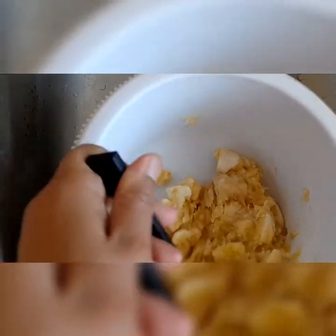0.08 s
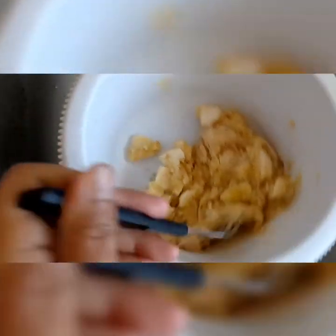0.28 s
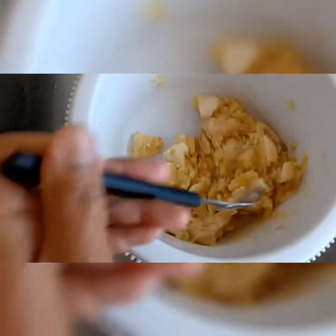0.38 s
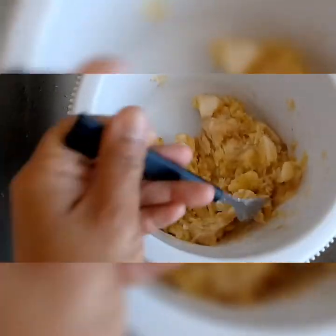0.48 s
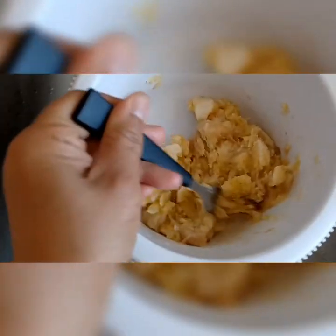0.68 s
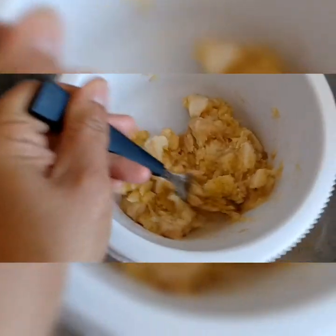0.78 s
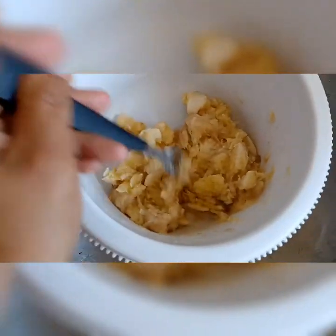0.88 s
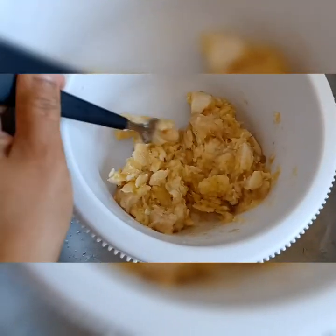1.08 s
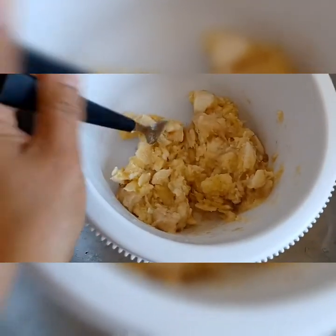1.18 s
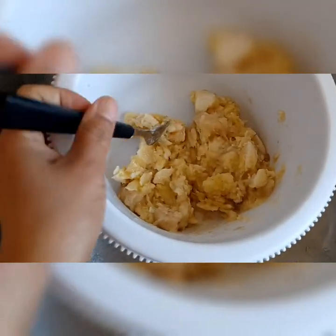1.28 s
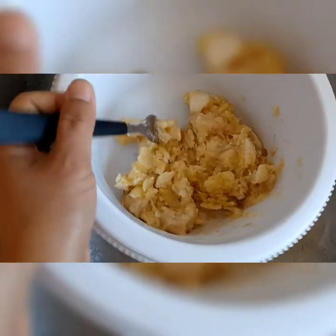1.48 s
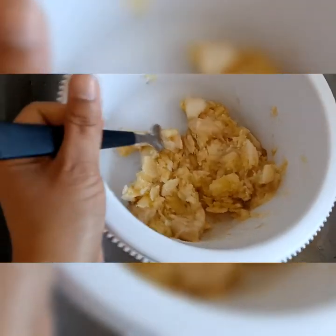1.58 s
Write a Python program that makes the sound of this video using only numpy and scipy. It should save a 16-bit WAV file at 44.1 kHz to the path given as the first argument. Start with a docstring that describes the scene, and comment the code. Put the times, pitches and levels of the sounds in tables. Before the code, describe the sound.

A fork mashes sticky pulp: quick squelches with low rubbing groans, hollow plastic knocks and faint tine squeaks, a pause, a dull bowl tap on the basin, and a last weak squish, heard close in a small reverberant kitchen.

```python
"""A wet squish is heard first, close by: a fork mashing ripe banana in a plastic bowl in a kitchen sink.
Bursts of impulsive grains, filtered, make the pulp; the same grains drive the bowl's resonances to a groan.
Narrow-band noise makes the tines squeak; decaying sines make the bowl knock and the basin boom.
Decaying coloured noise gives the smacks, clacks and foot taps, the last two with short rings.
Decaying noise tails form the small hard room, over a steady hush."""
import sys
import numpy as np
from scipy import signal
from scipy.io import wavfile
from scipy.ndimage import uniform_filter1d

SR = 44100
rng = np.random.default_rng(int(sys.argv[2]) if len(sys.argv) > 2 else 0)


def log_audio(samples):
    """Write samples as a 16-bit WAV file to the path given in sys.argv[1]."""
    # one column per channel
    frames = np.atleast_2d(samples).T
    # limit to full scale, then quantise
    limited = np.clip(frames, -1, 1)
    pcm = np.round(limited * 32767).astype(np.int16)
    wavfile.write(sys.argv[1], SR, pcm)


N = 70560
T = np.arange(N) / SR  # time in seconds

# Strokes of the fork, one curve each: time_s, squish_level_db, groan_db (against the squish),
# pitch_hz (of the loaded bowl)
STROKES = [
    [(0, -42.5, -17, 458), (.03, -48.5, -3.5, 434), (.08, -50.5, -32, 436), (.12, -55.5, -18, 436),
     (.15, -55.5, -2, 412), (.2, -57, 6, 435)],
    [(.215, -35, 4, 452), (.24, -36.5, 0.5, 449), (.275, -30, -6, 444), (.305, -36.5, -30, 453),
     (.33, -42, -29, 449)],
    [(.34, -40.5, -21, 437), (.362, -26.5, 10, 436.2), (.378, -30.5, 8.5, 423.5), (.392, -27, -4.5, 429),
     (.412, -30.5, 3, 436), (.43, -27.5, -10, 456), (.46, -37.5, -30, 419), (.49, -40, -12, 434),
     (.54, -67, 4, 430)],
    [(.772, -62.5, 9, 371), (.81, -43.5, 1, 390), (.845, -37, 2.5, 402), (.87, -33.5, 4, 432),
     (.905, -31, -33, 442), (.93, -40, -13, 383), (.96, -31, -12, 307.5), (1.0, -40, -11, 300),
     (1.05, -71, -7, 314)],
    [(1.455, -60, 14.5, 320), (1.467, -37, -5, 318), (1.482, -60, 11, 317), (1.5, -96, -10, 320)],
    [(1.535, -61, -21, 320), (1.555, -44.5, 4.5, 318), (1.58, -45.5, -18, 323), (1.6, -37.5, -1, 339)],
]
# Spectrum of the squish: frequency_hz, relative_level_db (per Hz)
PULP_SPECTRUM = [(100, -7), (350, -5.5), (800, -4.5), (1050, -3.5), (1250, 0), (1430, -5), (1750, 2),
                 (2200, -1.5), (3200, -0.5), (3900, 0.5), (5600, -2), (7000, -11), (8600, -15.5),
                 (10500, -9.5), (12500, -9.5), (15500, -11.5)]
# Bowl resonances rubbed by the tines: ratio (to the bowl's pitch), width_hz (of each of two poles), level_db
GROAN_RESONANCES = [(0.521, 79.4, -14), (.8, 60.5, -9), (0.998, 50, 1), (1.44, 61, -7.5), (1.62, 74, -8)]
# Tines squeaking over the plastic: start_s, length_s, start_hz, end_hz, level_db
TINE_SQUEAKS = [(-0.038, 0.18, 1272, 1240, -44), (-0.048, 0.17, 1010, 995, -50.5),
                (.31, 0.18, 1840, 1840, -44), (.82, 0.094, 1816, 1720, -38.5),
                (.88, 0.081, 1640, 1586, -38), (.87, 0.12, 3900, 3800, -36.5), (.83, .055, 611, 642, -34.5),
                (.96, 0.074, 548, 573, -46), (1.55, 0.1, 1800, 1680, -51.5)]
# Bowl rocking on the basin: start_s, level_db, upper_modes_db, free (share of the full ring length)
THUMPS = [(0, -44.5, 7.5, 0.81), (0.053, -47.5, 9.5, 1.07), (0.132, -29, 2, 0.28), (0.162, -32, 2, 0.47),
          (.214, -21.5, 2.5, 1), (0.248, -26, 5, .9), (0.356, -26, 0, 0.86), (.475, -37.5, 14.5, 0.91),
          (0.509, -31.5, -13, 1), (.802, -32.5, -14, 0.75), (0.965, -33, 6, 0.54),
          (1.029, -49.5, 17.5, 0.79), (1.22, -23.5, -4, 1.09), (1.307, -34.5, -0.5, 1.02),
          (1.403, -32.5, 5.5, 0.48), (1.47, -35.5, 4, 0.66), (1.548, -37.5, 2, 0.94)]
# Hollow boom of the basin: frequency_hz, level_db, t60_s (at full ring length)
BASIN_MODES = [(118.1, 3, 0.14), (122.05, -6.5, .4), (173.5, -6, 0.14), (210.7, -3.5, 0.089),
               (264.7, -14.5, 0.17), (313.7, -15, 0.16)]
# Wet pulp snapping apart: start_s, level_db, t60_s
SMACKS = [(.0505, -38.5, 0.027), (.1228, -40, .01), (.1415, -56, 0.017), (.186, -50, .04),
          (.199, -56, 0.015), (0.695, -73, .03), (0.729, -65, 0.17), (.7715, -51, .03), (.7865, -43, 0.011),
          (.843, -36, 0.032), (.86, -36, 0.04), (.393, -31, 0.036), (.452, -27, .03), (1.345, -66, .1),
          (1.46, -63, 0.044)]
# Spectrum of the snapping pulp: frequency_hz, relative_level_db (per Hz)
SMACK_SPECTRUM = [(500, -27), (4000, 7), (8000, -14), (11000, 0), (13000, 10.5), (16000, -7)]
# Fork bottoming through the pulp: start_s, level_db, pitch_hz (of the loaded bowl), lower_modes_db,
# upper_modes_db, contact_s (time constant of the onset), after_ring_db
KNOCKS = [(0.2133, -7.5, 455.6, 2, -4.5, 0.0021, -13.5), (.356, -12.5, 431, -3, 9, 0.0024, -18.5),
          (.3635, -14.5, 433.3, -1, 3.5, 0.0012, -15.5), (.761, -35, 386, -3, -18, 0.0013, -38),
          (0.8533, -17.5, 398.4, -7, -6, 0.0021, -23), (.916, -34.5, 370, -10, -8, 0.0022, -16),
          (.963, -22.5, 316, -4, 3, 0.0023, -16)]
# Bowl modes: ratio (to the bowl's pitch), level_db, t60_s
BOWL_MODES = [(.48, -6, 0.062), (.67, -18, 0.16), (1, 1.5, 0.059), (1.48, -13.5, 0.085),
              (1.82, -12.5, 0.058), (2.02, -22.5, 0.088), (2.29, -20, 0.063), (2.74, -21, 0.028)]
# Hard contacts of fork and bowl: start_s, level_db, t60_s, tilt_db_per_octave, ring_db, ring_pitch_hz
CLACKS = [(.2138, -19.5, 0.068, -3, -26, 2280), (.963, -25, 0.042, 1.7, 2.5, 1853),
          (.9665, -23.5, 0.026, -0.95, -8.5, 1783)]
# Spectrum of metal on plastic: frequency_hz, relative_level_db (per Hz)
CLACK_SPECTRUM = [(200, -11.5), (700, -11), (1200, 1.5), (1450, -14.5), (2200, -0.5), (3500, -9.5),
                  (5900, -0.5), (8000, -10.5), (11000, -3), (13500, -4.5), (16000, -22)]
# Tine modes: ratio (to the ring pitch), level_db, t60_s
TINE_MODES = [(.88, -3.5, 0.056), (1, -3.5, 0.09), (2.01, 1.5, 0.039), (2.21, -2.5, 0.025),
              (2.6, 0.5, 0.041)]
# Bowl's foot tapping the sink: start_s, level_db, rattle_db, rattle_t60_s, tilt_db_per_octave
TAPS = [(1.212, -15, -11, 0.057, 0), (1.4782, -31.5, 1.5, 0.042, -0.5)]
# Spectrum of the foot on the sink: frequency_hz, relative_level_db (per Hz)
FOOT_SPECTRUM = [(100, -5), (220, 2), (400, -1), (650, 2), (950, -4.5), (1250, -1.5), (1500, -9),
                 (1750, -5), (2150, -8), (3000, -12.5), (4200, -19.5), (6600, -20.5), (8200, -38),
                 (12800, -33.5), (16000, -37)]
# Ring of the foot: frequency_hz, level_db, t60_s
FOOT_MODES = [(426, -9, 0.15), (643, -4, .045), (745, -8, 0.017), (1010, 0, 0.021), (1030, 2.5, .03),
              (1290, -11, .035), (1740, -24, 0.024), (1980, -13, 0.029)]
# Reverberation: frequency_hz, t60_s
ROOM_DECAY = [(100, 0.71), (500, 0.44), (2000, 0.45), (5000, 0.45), (9000, 0.32), (15000, .3)]
# Spectrum of the background hush: frequency_hz, relative_level_db (per Hz)
HUSH_SPECTRUM = [(25, -28), (60, -7.5), (115, 13.5), (170, -2), (400, -14.5), (1000, -12.5), (5000, -17),
                 (9000, -33.5), (16000, -23)]

GRAINS_PER_S, GRAIN_SPREAD_DB = 7000, 1.5  # spread: dB per unit of an exponential draw
CLUMP_DB, CLUMP_S = 1.5, 0.0038  # rms swing of the grain level, averaging window
SQUEAK_WIDTH, SQUEAK_SKEW = 0.097, 0.49  # width as a share of the pitch; a skew under 1 peaks early
THUMP_RISE_S, CLACK_RISE_S, TAP_RISE_S = 0.004, 0.00045, 0.0025  # time constants
AFTER_RING_T60_S = 0.4
TAP_CRACK_DB, TAP_CHATTER_DB, TAP_T60_S = 10.5, -4.5, 0.013
FOOT_DB, HUSH_DB = -17.5, -61
SQUISH_ROOM_DB, HIT_ROOM_DB, KNOCK_ROOM_DB, LOW_ROOM_DB = -8, -9, -14.5, -16  # sends to the room
KNOCK_LOW_CUT_HZ, LOW_CUT_HZ, EDGE_HZ = 69, 54, 15800


def amp(db):
    """Level law: decibels to amplitude gain."""
    return 10 ** (np.asarray(db) / 20)


def unit(x):
    """Normalisation to an rms of 1."""
    return x / np.sqrt(np.mean(x ** 2) + 1e-20)


def read(points, hz):
    """Linear interpolation of a table on a log-frequency axis."""
    f, value = np.transpose(points)
    return np.interp(np.log(hz + 1), np.log(f + 1), value)


def add(mix, s, sound):
    """Superposition: mixes a sound in at time s."""
    part = mix[max(round(s * SR), 0):]
    part += sound[:len(part)]


def colour(x, points, tilt_db=0, size=4096):
    """Minimum-phase filtering: a causal response of energy 1 with the given spectral shape."""
    hz = abs(np.fft.fftfreq(size, 1 / SR))
    level_db = read(points, hz) + tilt_db * np.log2(hz + 1)
    log_gain = np.log(amp(level_db))
    # The Hilbert transform of the log gain supplies the minimum phase
    response = np.exp(np.conj(signal.hilbert(log_gain)))
    taps = np.fft.ifft(response).real[:size // 2]
    return signal.fftconvolve(x, taps / np.linalg.norm(taps))[:N]


def resonate(x, hz, width):
    """Resonance by heterodyning: shift the pitch curve to zero, low-pass with two poles, shift back."""
    turn = np.exp(2j * np.pi * np.cumsum(hz * np.ones(N)) / SR)
    r = np.exp(-np.pi * width / SR)
    smoothed = signal.lfilter([(1 - r) ** 2], [1, -2 * r, r * r], x / turn)
    return (turn * smoothed).real


def fade(t60):
    """Exponential decay: a fall of 60 dB in t60 seconds."""
    return np.exp(-np.log(1000) * T / max(t60, 1e-3))


def rise(time_constant):
    """Exponential approach to full strength, as at a soft contact."""
    return 1 - np.exp(-T / time_constant)


def mode(hz, db, t60):
    """Modal vibration: one exponentially damped sine."""
    return amp(db) * fade(t60) * np.sin(2 * np.pi * hz * T)


def grains():
    """Random impulses: tiny slips and bursting films of pulp, uneven in size and level-clumped."""
    size_db = GRAIN_SPREAD_DB * np.minimum(rng.exponential(1, N), 5)
    sizes = amp(size_db) * rng.choice([-1, 1], N)
    clumps = unit(uniform_filter1d(rng.standard_normal(N), max(int(CLUMP_S * SR), 2)))
    happens = rng.random(N) < GRAINS_PER_S / SR
    return unit(sizes * happens * amp(CLUMP_DB * clumps))


def squish():
    """Crushing and friction: each stroke presses pulp into noise and rubs the bowl into a low groan."""
    press, rub = np.zeros((2, N))
    for stroke in STROKES:
        s, db, groan_db, _ = np.transpose(stroke)
        outside = np.maximum(np.maximum(s[0] - T, T - s[-1]), 0)  # seconds away from the stroke
        level = amp(np.interp(T, s, db)) * np.exp(-outside / 0.0048)
        press += level
        rub += level * amp(np.interp(T, s, groan_db))
    s, _, _, hz = np.vstack(STROKES).T
    drive = grains()
    pitch = np.interp(T, s, hz)
    groan = np.zeros(N)
    for ratio, width, db in GROAN_RESONANCES:
        groan += amp(db) * unit(resonate(drive, pitch * ratio, width))
    return colour(drive * press, PULP_SPECTRUM) + rub * unit(groan)


def squeaks():
    """Stick and slip of the tines: a rough note that swells quickly and drifts in pitch."""
    out = np.zeros(N)
    for s, length, start_hz, end_hz, db in TINE_SQUEAKS:
        u = np.clip((T - s) / length, 0, 1)  # progress through the squeak
        pitch = start_hz + (end_hz - start_hz) * u
        note = unit(resonate(rng.standard_normal(N), pitch, SQUEAK_WIDTH * start_hz))
        swell = np.sin(np.pi * u ** SQUEAK_SKEW) ** 2
        out += amp(db) * swell * note
    return out


def thumps():
    """Modal excitation: the pushed bowl makes the basin boom, shorter when it is held down."""
    out = np.zeros(N)
    for s, db, upper_db, free in THUMPS:
        ring = np.zeros(N)
        for k, (hz, level, t60) in enumerate(BASIN_MODES):
            ring += mode(hz, level + upper_db * (k > 2), t60 * free)
        add(out, s, amp(db) * ring * rise(THUMP_RISE_S))
    return out


def smacks():
    """Adhesive release: thin bright crackles of decaying noise as sticky pulp lets go."""
    out = np.zeros(N)
    for s, db, t60 in SMACKS:
        add(out, s, amp(db) * fade(t60) * rng.standard_normal(N))
    return colour(out, SMACK_SPECTRUM)


def knocks():
    """Mass loading: the bowl rings hollow and short, lower under more pulp; its main note lingers."""
    out = np.zeros(N)
    for s, db, hz, lower_db, upper_db, contact, after_db in KNOCKS:
        ring = mode(hz, after_db, AFTER_RING_T60_S)
        for k, (ratio, level, t60) in enumerate(BOWL_MODES):
            mode_db = level + lower_db * (k < 2) + upper_db * (k > 2)
            ring += mode(hz * ratio, mode_db, t60)
        add(out, s, amp(db) * ring * rise(contact))
    return out


def clacks():
    """Impact: metal chatters on plastic as decaying noise and the tines ring briefly: (noise, ring)."""
    out = np.zeros((2, N))
    onset = rise(CLACK_RISE_S)
    for s, db, t60, tilt_db, ring_db, hz in CLACKS:
        chatter = colour(rng.standard_normal(N) * fade(t60), CLACK_SPECTRUM, tilt_db)
        ring = sum(mode(hz * ratio, level, decay) for ratio, level, decay in TINE_MODES)
        add(out[0], s, amp(db) * onset * chatter)
        add(out[1], s, amp(db + ring_db) * onset * ring)
    return out


def taps():
    """Impulse response: the foot drops back with a dull crack, a rattle and a short ring: (noise, ring)."""
    out = np.zeros((2, N))
    for s, db, rattle_db, t60, tilt_db in TAPS:
        rattle = amp(TAP_CHATTER_DB) * fade(TAP_T60_S) + amp(rattle_db) * fade(t60)
        force = rng.standard_normal(N) * rattle * rise(TAP_RISE_S)
        force[0] += amp(TAP_CRACK_DB)  # the first touch is a single impulse
        add(out[0], s, amp(db) * colour(force, FOOT_SPECTRUM, tilt_db))
        add(out[1], s, amp(db + FOOT_DB) * sum(mode(*row) for row in FOOT_MODES))
    return out


def room(x):
    """Diffuse reverberation: noise tails whose treble dies first; three take turns to keep it even."""
    out = np.zeros(N)
    for k in range(3):
        hz, t, z = signal.stft(rng.standard_normal(SR), SR, nperseg=256)
        decay = np.exp(-np.log(1000) * t / read(ROOM_DECAY, hz)[:, None])
        tail = signal.istft(z * decay, SR, nperseg=256)[1]
        tail *= 1 - np.exp(-T[:len(tail)] / 0.0082)
        # The three tails share the input in a 4 Hz cycle at constant total power
        share = np.sqrt(2 / 3) * np.cos(2 * np.pi * (4 * T + k / 3))
        out += signal.fftconvolve(x * share, tail / np.linalg.norm(tail))[:N]
    return out


def low_cut(x, hz):
    """High-pass filtering: a second-order Butterworth slope."""
    return signal.sosfilt(signal.butter(2, hz, "high", fs=SR, output="sos"), x)


def hush():
    """Stationary noise: a faint steady background with a fixed spectrum."""
    return amp(HUSH_DB) * colour(rng.standard_normal(N), HUSH_SPECTRUM)


def scene():
    """Superposition of direct sounds, room and hush; clack and tap rings do not excite the room."""
    wet = squish() + squeaks() + smacks()
    hits, rings = clacks() + taps()
    knock = low_cut(knocks(), KNOCK_LOW_CUT_HZ)
    boom = thumps()
    to_room = amp(SQUISH_ROOM_DB) * wet + amp(HIT_ROOM_DB) * hits
    to_room += amp(KNOCK_ROOM_DB) * knock + amp(LOW_ROOM_DB) * boom
    return (wet + hits + rings + knock + boom + room(to_room) + hush())[None]


def record(dry):
    """Band limiting: the microphone's low cut and the recorder's upper edge."""
    band_limit = signal.firwin(601, EDGE_HZ, window=("kaiser", 9), fs=SR)
    return signal.oaconvolve(low_cut(dry, LOW_CUT_HZ), band_limit[None], "same")


dry = scene()
out = record(dry)
log_audio(out)
```